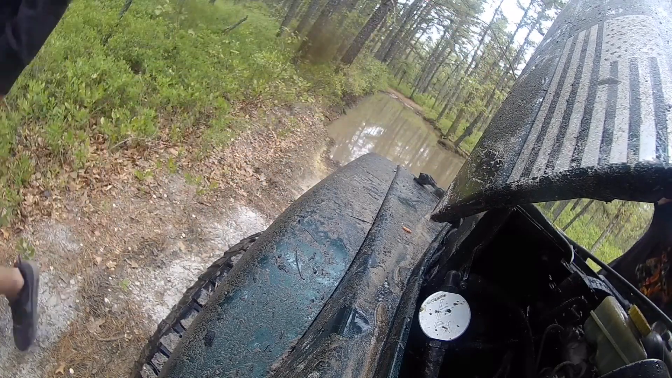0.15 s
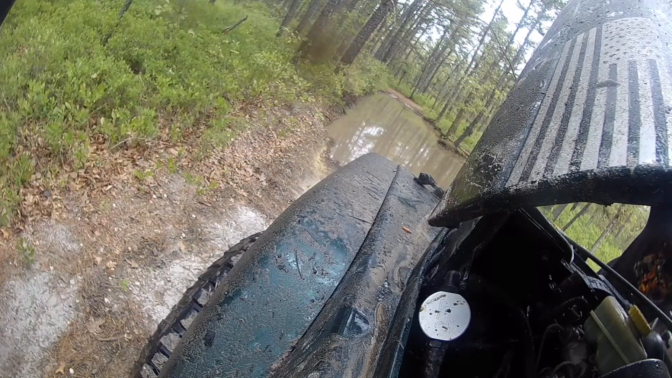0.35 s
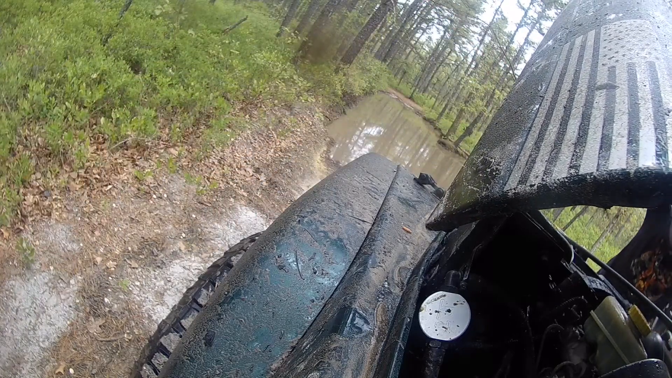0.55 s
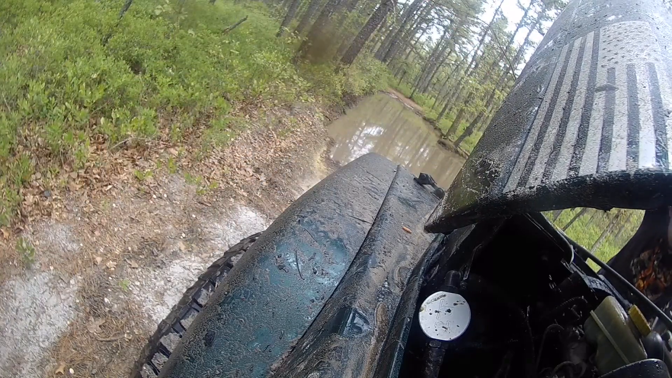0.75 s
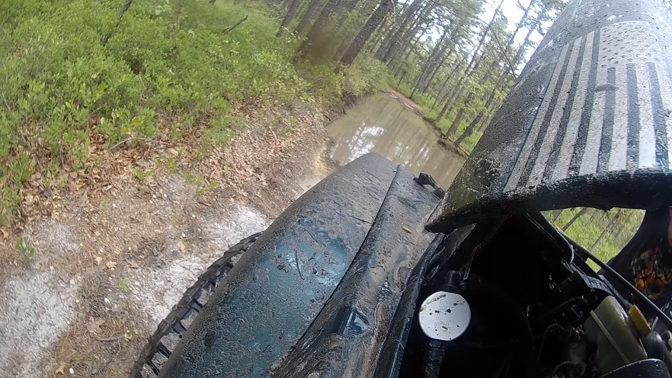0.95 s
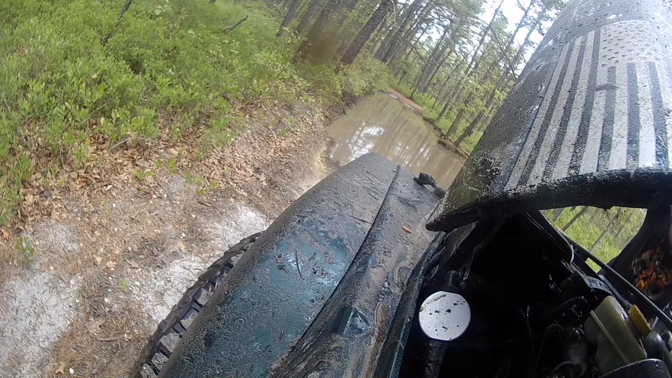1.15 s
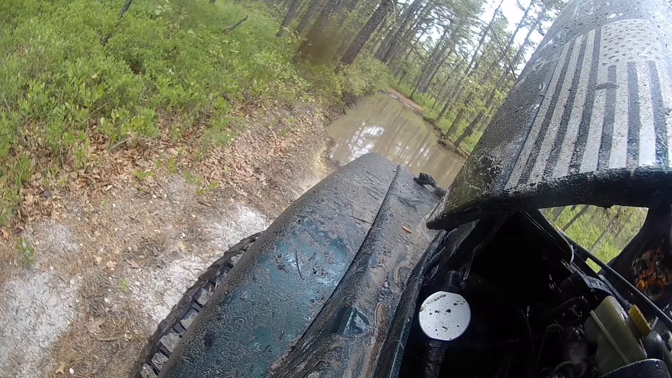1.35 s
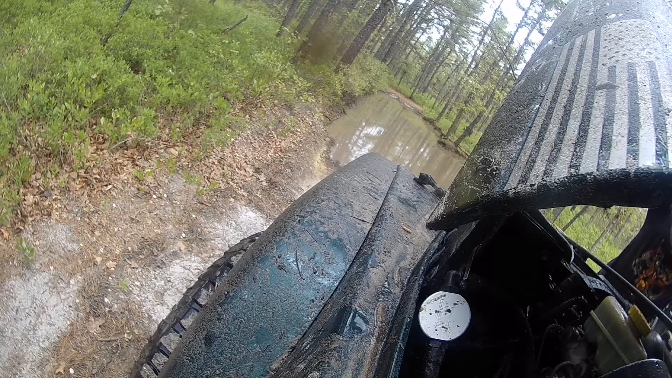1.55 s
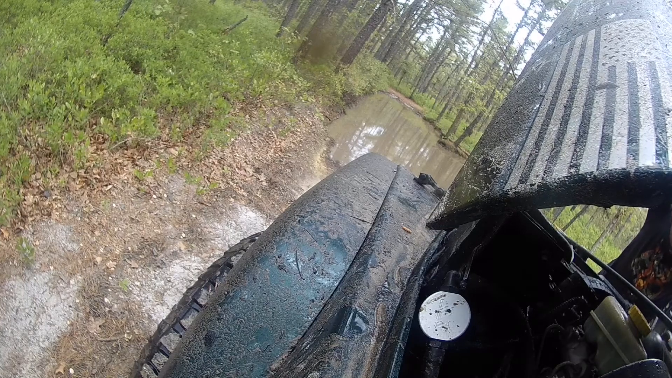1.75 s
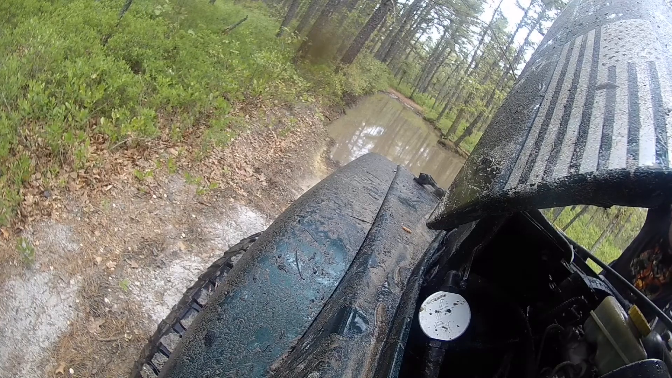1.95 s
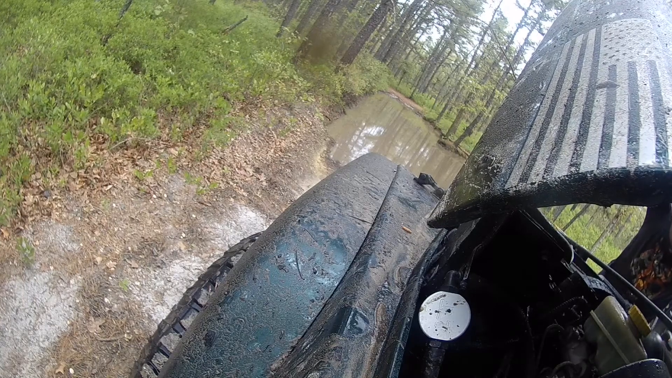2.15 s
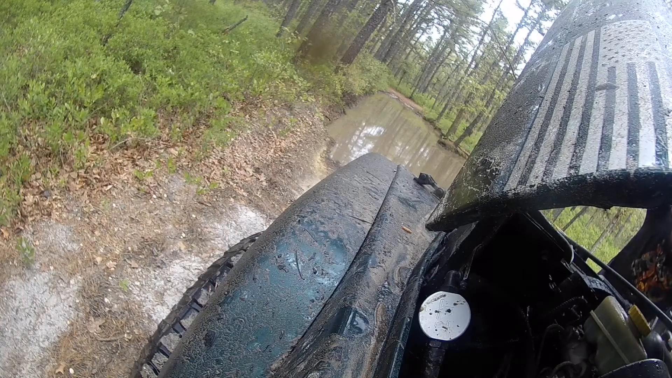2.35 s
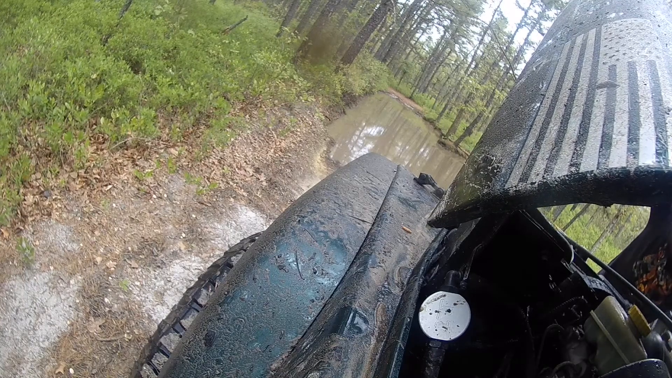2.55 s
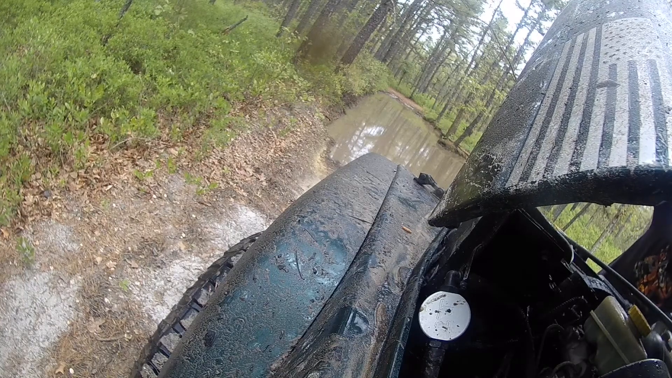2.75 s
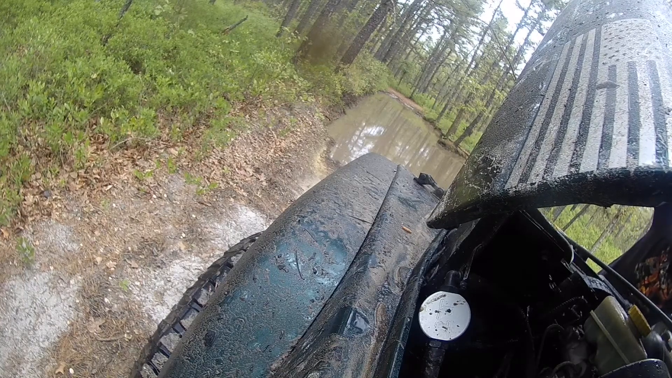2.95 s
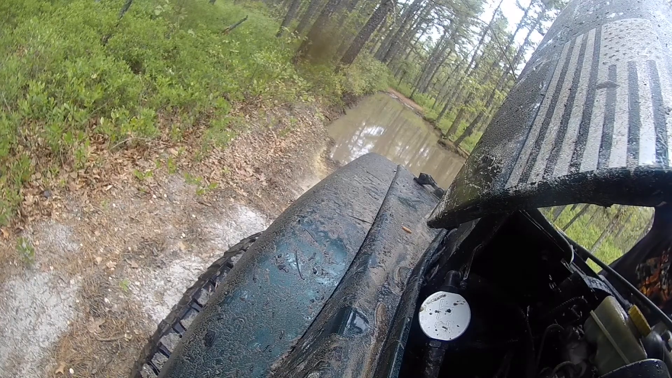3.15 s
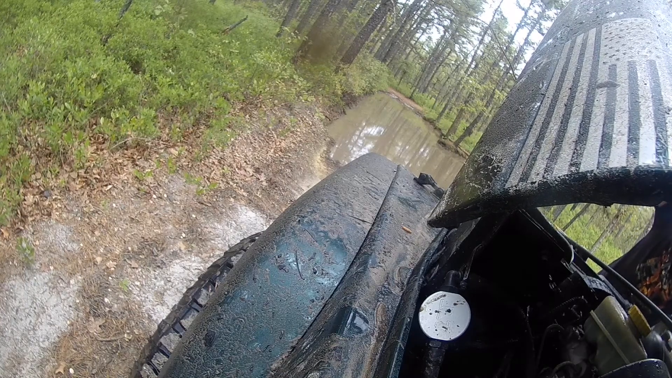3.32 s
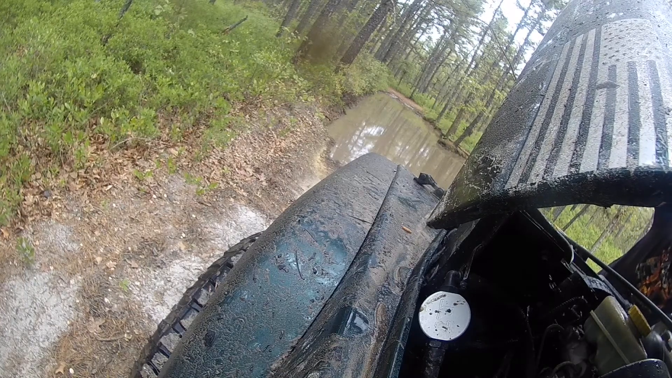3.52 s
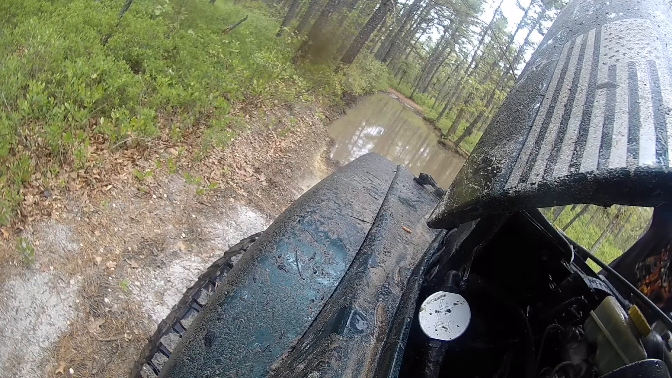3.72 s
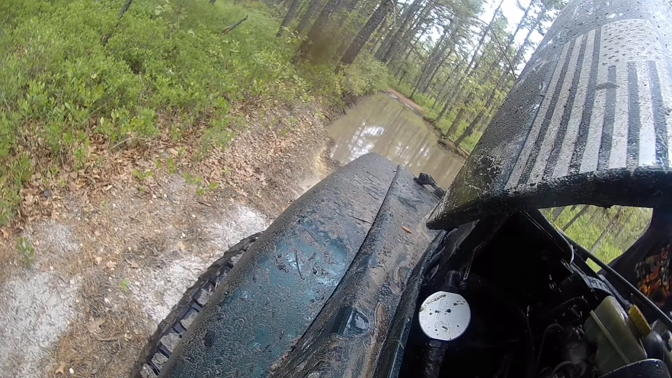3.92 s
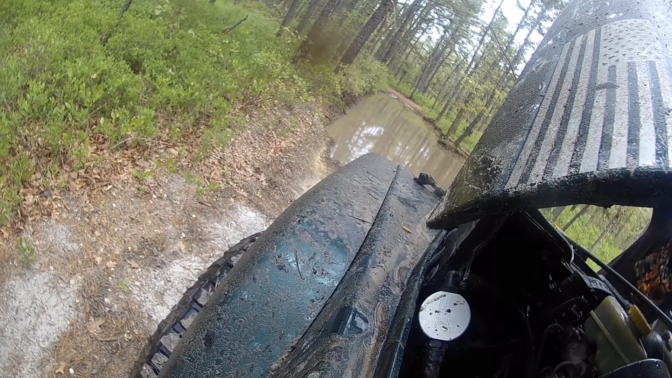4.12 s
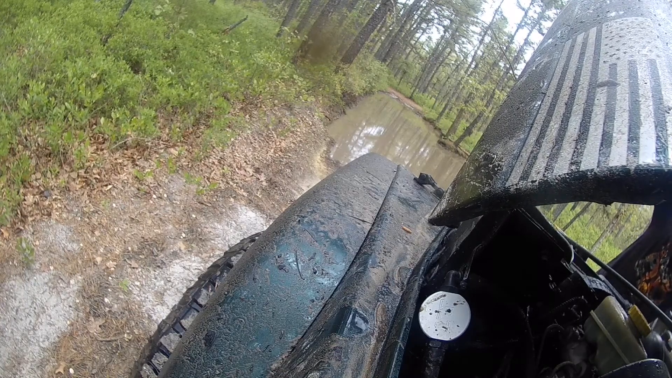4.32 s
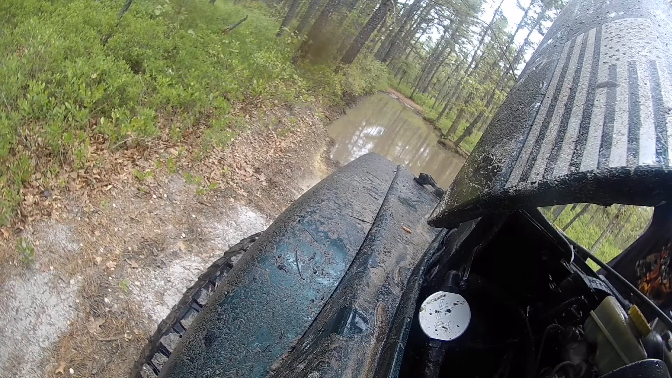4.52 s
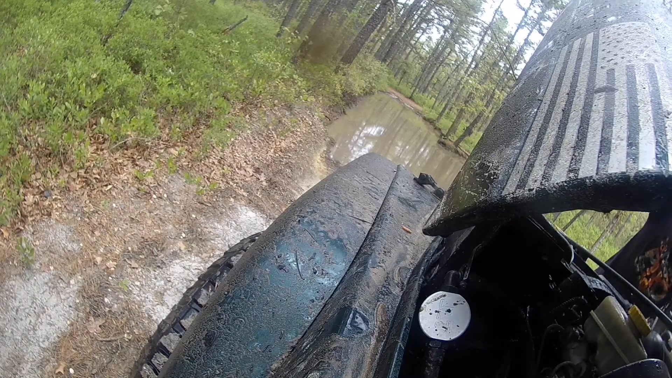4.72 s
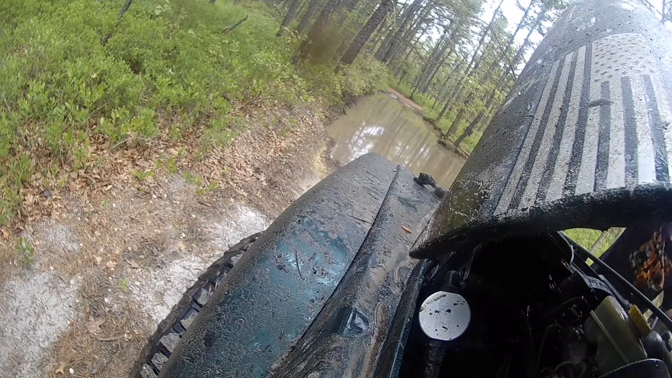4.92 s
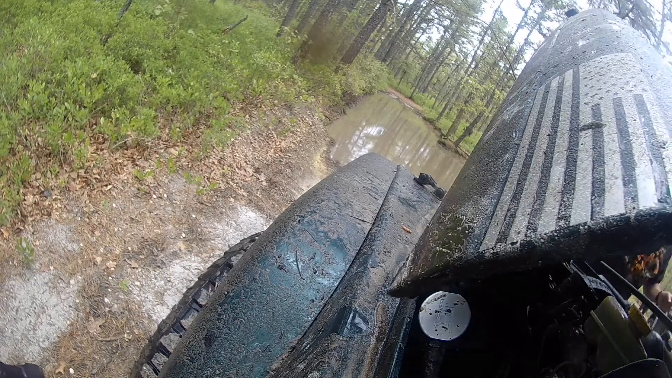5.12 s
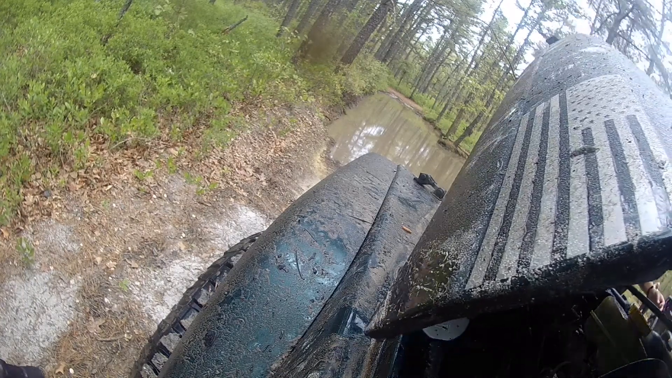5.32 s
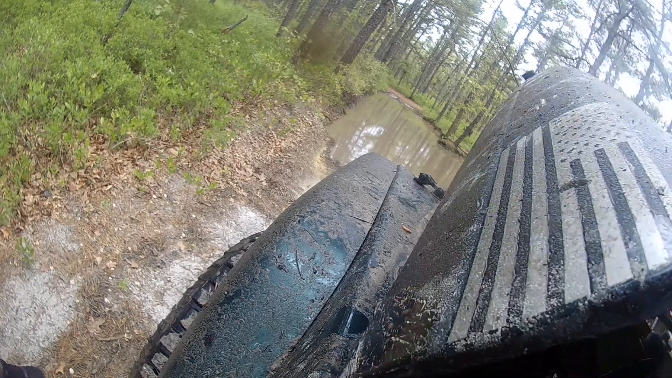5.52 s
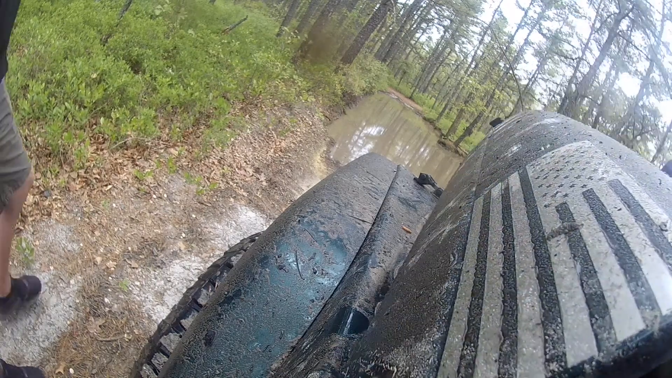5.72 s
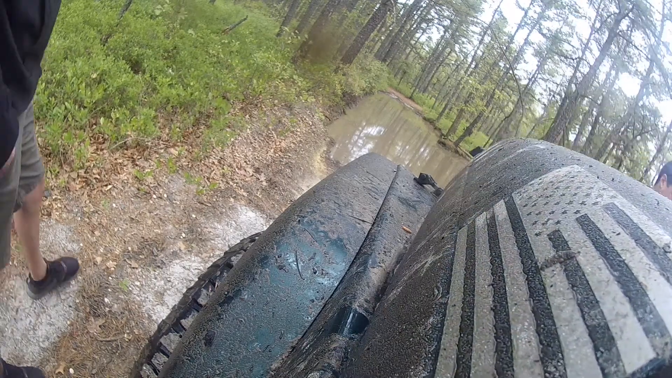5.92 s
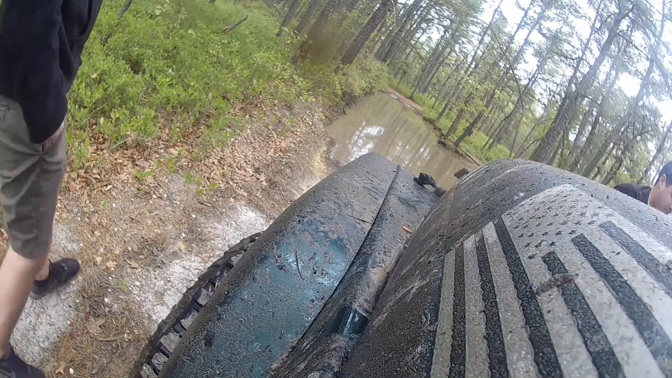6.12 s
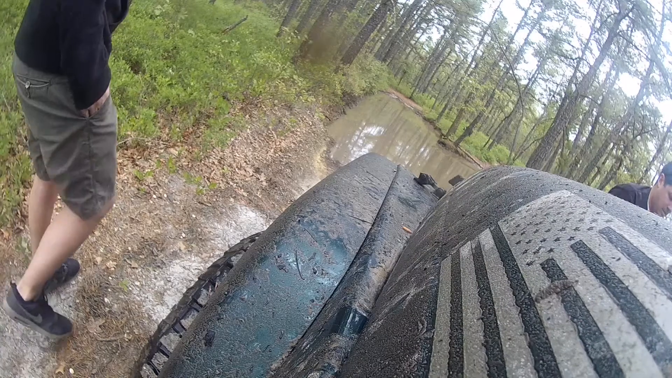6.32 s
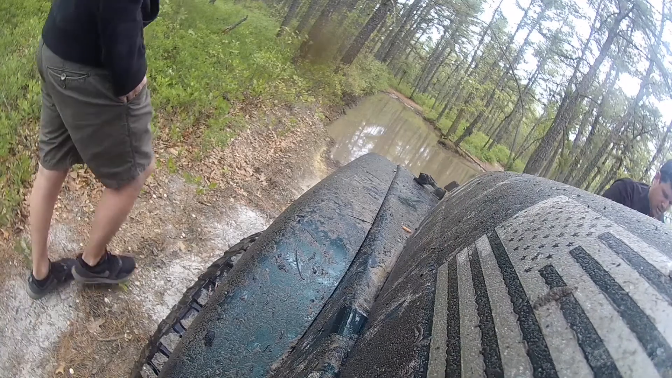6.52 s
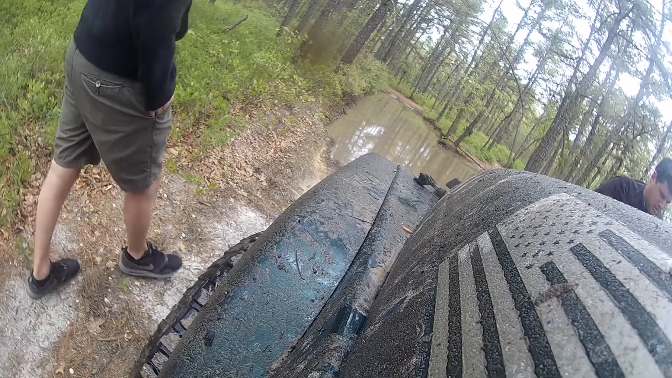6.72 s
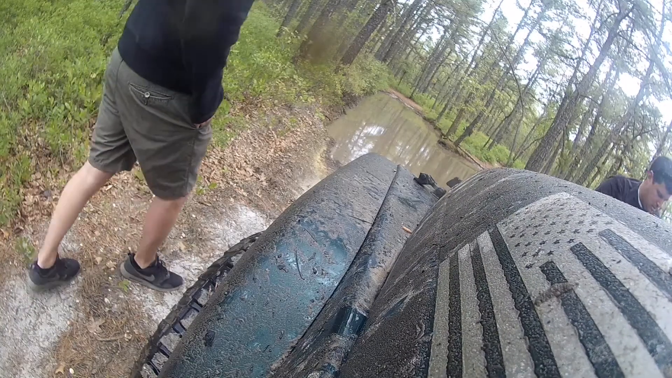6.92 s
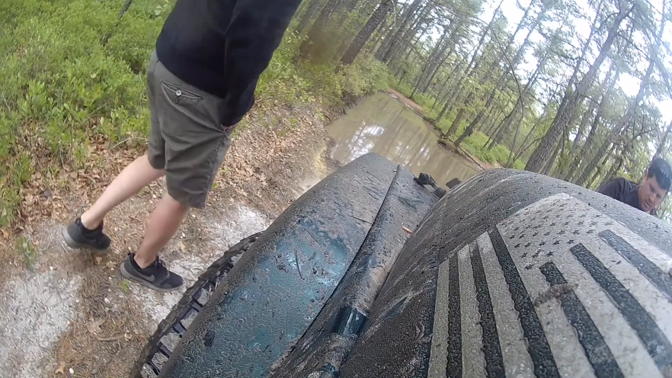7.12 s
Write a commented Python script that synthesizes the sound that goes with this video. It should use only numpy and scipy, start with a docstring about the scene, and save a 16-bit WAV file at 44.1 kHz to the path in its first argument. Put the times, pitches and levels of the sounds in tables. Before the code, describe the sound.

Soft woodland hiss and low murmur surround a raised metal hood. Sparse dull knocks, scratchy hinge rubs and faint low wobbling come through the bodywork carrying the microphone. After a near lull, the hood strikes its latch and slams home in two rapid, harsh, overloaded clanks. The latch chatters briefly, the body thuds, and a buzzing bass shudder dies away, with only a faint scattered echo from the trees.

```python
"""The hood of a parked off-road vehicle on a forest trail drops, strikes its latch and slams home.
Before that come a few knocks and rubs while it is held open. The slam rings the steel panel and latch
and overloads the microphone, then the hood rattles briefly as it settles. The jolted bodywork that
carries the microphone thuds and shudders with a deep, slowly dying rumble. Trees scatter the metal
sounds back faintly, over the filtered noise of quiet woodland air."""
import sys
import numpy as np
from scipy import signal
from scipy.fft import rfft, irfft
from scipy.io import wavfile

SR = 44100
rng = np.random.default_rng(int(sys.argv[2]) if len(sys.argv) > 2 else 0)


def wav_out(sig):
    """Save sig, one row per channel (or a flat mono array), as 16-bit PCM at SR to the path in sys.argv[1]."""
    wavfile.write(sys.argv[1], SR, np.round(np.clip(np.atleast_2d(sig).T, -1, 1) * 32767).astype(np.int16))


N = 320166  # length in samples

# Woodland air. Each row: pitch in Hz, relative level in dB.
AIR = [(12, -27), (20, 3.5), (33, -12.5), (53, -4), (98, -7.5), (187, -9), (319, -13.5), (357, -14),
       (607, -18.5), (1150, -24), (1330, -26), (1480, -25.5), (1960, -29), (13500, -41), (16000, -38.5)]
AIR_DB = -49

# Shoves that rock the bodywork before the hood shuts.
# Each row: start in seconds, length in seconds, strength in dB.
SHOVES = [(0, 0.074, -43.5), (0.677, .27, -49.5), (1.142, 0.077, -44.5), (1.433, 0.059, -46.5),
          (1.862, .38, -42), (2.603, 0.11, -38), (3.022, 0.0784, -45), (3.299, 0.199, -46),
          (3.683, 0.11, -42), (4.232, .45, -40), (5.58, .06, -45.5)]
SHOVE_RISE_S, SHOVE_FALL_S = 0.028, 0.055
# While held open, the hood keeps up a faint, growing sway that stops over a second before it drops.
HELD_SWAY_S, HELD_RISE_S, HELD_DB = 4.75, 2.96, -47
# Jolts that set the bodywork swinging freely. Each row: start in seconds, strength in dB.
JOLTS = [(6.125, -25.5), (6.478, -7)]
JOLT_RISE_S, JOLT_FALL_S = 0.0198, 0.305
SWAY_HZ, SAG_HZ = 48.2, 9  # pitch of a small swing, and how far it sags at the widest
STOP_DB, BUZZ_DB = -16.5, -24.5  # swing at which the mounting meets its stop; buzz at the widest swing
# Each soft thud briefly checks the swing: depth, lag and width of the dip.
CHECK_DB, CHECK_LAG_S, CHECK_WIDTH_S = -6, 0.026, 0.019

# Rubs of the hood and its hinges. Each row: start in seconds, length in seconds, level in dB.
RUBS = [(0, 0.89, -62.5), (0.898, .75, -60), (4.878, .28, -59.5), (5.512, 0.15, -54.5)]
RUB_RISE_S, RUB_FALL_S, RUB_REST_DB = 0.061, 0.12, -66.5

# Bounces of the hood in its latch as it settles. Each row: start in seconds, strength in dB.
BOUNCES = [(6.386, -29), (6.408, -30), (6.431, -35), (6.470, -23.5), (6.504, -34), (6.603, -50)]
BOUNCE_RISE_S, BOUNCE_FALL_S = 0.012, 0.016
RATTLE_REST_DB = -46  # faint rattle kept up by the rocking, relative to it
# Resonances of the rattling latch and hood edge. Each row: pitch in Hz, width in Hz, level in dB.
RATTLE_RING = [(810, 150, -11), (902, 23, 4), (1126, 100, -9), (1433, 37, -8), (1740, 48, -17),
               (2210, 100, -26), (2730, 22, -20)]

# Knocks on the held hood, then bumps of the mounting and a last light tick after the slam.
# Each row: start in seconds, metal level in dB, brightness in Hz, contact fade time in seconds,
# frame level in dB.
KNOCKS = [(0.387, -43, 3450, .012, -40.5), (.771, -54, 2800, .017, -49), (1.3143, -38.5, 3100, 0.011, -41),
          (1.862, -34.5, 2180, 0.011, -37), (1.881, -46, 1390, .005, -39), (3.499, -55.5, 1900, .007, -60),
          (4.179, -43, 8050, .007, -31.5), (4.194, -48, 2200, .007, -49), (4.23, -46, 3200, 0.0051, -39.5),
          (4.237, -48.5, 1800, 0.0089, -29.5), (5.29, -44.5, 4580, 0.0056, -58),
          (6.469, -43.5, 3807, .018, -36), (6.538, -52, 2400, .01, -40), (7.082, -56, 9050, .004, -72.5)]
# Resonances of a knock on metal. Each row: pitch in Hz, width in Hz, level in dB.
KNOCK_RING = [(780, 70, -18), (1105, 70, 0), (1225, 60, 0), (1405, 65, 0), (1900, 90, -17), (2250, 100, -6),
              (3080, 160, -16), (4000, 700, -23)]
# Duller sound of the frame. Each row: pitch in Hz, relative level in dB.
KNOCK_BODY = [(90, -13), (170, -6), (300, -5), (500, -7), (750, -2), (1200, -12.5), (2500, -28),
              (6000, -55)]
# The frame part of a knock also thuds the bodywork: level relative to the frame, and lag.
KNOCK_THUD_DB, KNOCK_THUD_LAG_S = 1, 0.00497

# Soft thuds in the bodywork. Each row: start in seconds, level in dB.
THUDS = [(3.043, -37.5), (3.207, -39), (6.128, -34), (6.189, -26), (6.305, -28.5), (6.466, -13),
         (6.567, -34), (6.738, -24.5)]
# Low modes of the bodywork. Each row: pitch in Hz, level in dB, time to fade by 60 dB in seconds.
BODY = [(67.8, -12, 0.54), (131, -15, 0.17), (169.6, 2.5, 0.21), (185, -12.5, 0.12), (271, -22.5, 0.28),
        (358, -24, 0.11)]

# Echo of the trees. Each row: delay in seconds, relative level in dB.
TREES = [(.02, -54), (.1, -42), (.19, -48), (.3, -37), (.5, -64), (.9, -71)]

# Blows of the falling hood. Each row: start in seconds, then panel, latch, crash and crack levels in dB.
BLOWS = [(6.1236, -20, -9.5, -17, -31), (6.129, -20, -22, -24.5, -12.5), (6.1880, -1, -12.5, -16.5, -24),
         (6.1940, -22, -15, -13.5, -1.5), (6.1994, -16, -19, -17, -13)]
# Sheet-metal hood. Each row: pitch in Hz, level in dB, time to fade by 60 dB in seconds.
PANEL = [(172, -16, .17), (300, -20, .14), (440, -35, .2), (556, -17, .13), (775, -14, .11), (888, 3, .07),
         (1055, -14, .08), (1185, -15, .08), (1425, -11, .08), (2708, -21, .08), (3200, -24, .07),
         (5050, -42, .12), (328, -19, .22), (620, -26, .27), (878, -22, .46), (942, -25, .24),
         (1062, -23, .21), (1163, -30, .45), (1452, -32, .45), (1663, -35, .22), (1790, -37, .38),
         (1943, -33, .19), (2218, -45, .5), (2822, -50, .42), (3300, -46, .48)]
# Steel latch and striker. Each row: pitch in Hz, level in dB, time to fade by 60 dB in seconds.
LATCH = [(912, -4, .11), (1085, 0, .08), (1132, -2, .13), (1378, -5, .1), (1425, -12, .2), (1720, -11, .16),
         (1920, -19, .09), (2205, -22, .12), (2708, -21, .14), (2775, -29, .2)]
# Dense modes of the hood, heard as noise. Each row: pitch in Hz, relative level in dB.
CRASH = [(100, -8.5), (260, 4), (450, -8.5), (700, -4.5), (1000, 7), (1500, -7), (2200, -13.5), (3200, -26),
         (5000, -39), (9000, -67)]
# Hard crack of steel on steel. Each row: pitch in Hz, relative level in dB.
CRACK = [(200, -19), (1000, 4.5), (2500, -2.5), (3800, -9), (7000, -22), (15000, -28)]

CLIP_LEVEL = 0.5  # the input cuts off any peak beyond this
TOP_HZ = 15900  # hardly anything passes above this


def undb(db):
    """Decibels to gain."""
    return 10 ** (np.asarray(db) / 20)


def clock():
    """Time of every sample in seconds."""
    return np.arange(N) / SR


def curve(rows):
    """Rows of time in seconds and value, joined by straight lines."""
    return np.interp(clock(), *np.transpose(rows))


def unit(x):
    """Scale to rms 1."""
    return x / np.sqrt(np.mean(x ** 2))


def place(x, s):
    """A sound that starts at time s on an otherwise silent track."""
    return np.concatenate([np.zeros(int(s * SR)), x, np.zeros(N)])[:N]


def noise(points):
    """Noise of rms 1 whose spectrum follows rows of pitch in Hz and level in dB."""
    hz, db = np.transpose(points)
    f = np.maximum(np.fft.rfftfreq(N, 1 / SR), 1)
    gain = undb(np.interp(np.log(f), np.log(hz), db))
    return unit(irfft(rfft(rng.standard_normal(N)) * gain, N))


def walk(rate):
    """Slow chance with a spread near 1: random points, rate per second, joined by lines."""
    knots = np.arange(0, N / SR + 1, 1 / rate)
    return np.interp(clock(), knots, rng.standard_normal(len(knots)))


def ring(modes, rise_s):
    """One second of decaying modes; neighbours swing in opposite directions."""
    t = clock()[:SR]
    swing = 0
    for k, (hz, db, t60) in enumerate(modes):
        fade = undb(db - 60 * t / t60)
        swing = swing + (-1) ** k * fade * np.sin(2 * np.pi * hz * t)
    return swing * (1 - np.exp(-t / rise_s))


def resonate(x, peaks):
    """Pass a sound through resonances side by side; neighbours swing in opposite directions."""
    out = 0
    for k, (hz, width, db) in enumerate(peaks):
        b, a = signal.iirpeak(hz, hz / width, fs=SR)
        out = out + (-1) ** k * undb(db) * signal.lfilter(b, a, x)
    return out


def soften(x, hz, order=3):
    """Take away the treble above hz."""
    return signal.sosfilt(signal.butter(order, min(hz, SR / 3), fs=SR, output="sos"), x)


def burst(rise_s, fall_s):
    """One second of a quick swell and an exponential fade."""
    t = clock()[:SR]
    return (1 - np.exp(-t / rise_s)) * np.exp(-t / fall_s)


def swell(s, length_s, rise_s, fall_s):
    """A level that rises from time s and starts to fade once its length is over."""
    age = np.maximum(clock() - s, 0)
    rise = 1 - np.exp(-age / rise_s)
    return rise * np.exp(-np.maximum(age - length_s, 0) / fall_s)


def air():
    """Quiet woodland air: a low, restless murmur under smooth hiss."""
    bed = noise(AIR)
    murmur = 0.17 * walk(6) * soften(bed, hz=710)
    return undb(AIR_DB) * (bed + murmur)


def rocking():
    """How hard the bodywork is rocked: by the held hood, by shoves, and by jolts that die away slowly."""
    held = undb(HELD_DB) * swell(0, HELD_SWAY_S, HELD_RISE_S, SHOVE_FALL_S)
    shoves = [undb(db) * swell(s, length_s, SHOVE_RISE_S, SHOVE_FALL_S) for s, length_s, db in SHOVES]
    jolts = [undb(db) * swell(s, 0, JOLT_RISE_S, JOLT_FALL_S) for s, db in JOLTS]
    return np.max([held, *shoves, *jolts], axis=0)  # the strongest one wins


def shudder():
    """The bodywork's lowest mode sways; wide swings sag in pitch and bump the mounting's stop each cycle."""
    drive = rocking()
    strain = drive / drive.max()
    # the stop gently limits the swing, and soft thuds check it
    swing = drive / (1 + (drive / undb(STOP_DB)) ** 4) ** (1 / 4)
    dips = sum(np.exp(-((clock() - s - CHECK_LAG_S) / CHECK_WIDTH_S) ** 2) for s, _ in THUDS)
    swing = swing * undb(CHECK_DB * dips)

    # a weak sway is pushed about at random, a strong one rings steadily
    unrest = 1 / (1 + swing / 0.00717)
    pitch_hz = SWAY_HZ - SAG_HZ * strain ** 3.48 + 8 * unrest * walk(25)
    phase = 2 * np.pi * np.cumsum(pitch_hz) / SR
    wobble = undb(unrest * (2.9 * walk(30) - 2.0))
    sway = np.sqrt(2) * swing * wobble * np.sin(phase)

    # about one bump per cycle, uneven in timing and strength
    cycles = np.floor((phase + 0.8 * walk(45)) / (2 * np.pi))
    bumps = np.diff(cycles, prepend=0) * undb(3.4 * walk(40))
    buzz = unit(resonate(soften(bumps, hz=328), [(164, 38, -2.5), (208, 54, -12.0)]))
    # noise that chafes on one side of each swing
    chafe = np.maximum(np.sin(phase), 0) ** 2 * noise(KNOCK_BODY) * swing ** 2
    return sway + buzz * undb(BUZZ_DB) * strain ** 2.33 + undb(-18.0) * chafe


def rubbing():
    """Fine uneven slips in the hinges and under the hands sound through broad resonances of the hood."""
    slips = rng.standard_normal(N) * undb(2.9 * walk(120))
    rubs = sum(undb(db) * swell(s, length_s, RUB_RISE_S, RUB_FALL_S) for s, length_s, db in RUBS)
    level = np.maximum(rubs, undb(RUB_REST_DB))
    hood = [(1120, 177, 4.0), (1430, 620, -3.0), (2060, 830, -6)]  # Hz, width in Hz, dB
    return unit(resonate(soften(slips, hz=3500), hood)) * level


def rattle():
    """Many tiny contacts ring the latch and hood edge, faintly with the rocking and more at each bounce."""
    contacts = rng.standard_normal(N) * (rng.random(N) < 2500 / SR)  # about 2500 a second
    bounces = sum(place(undb(db) * burst(BOUNCE_RISE_S, BOUNCE_FALL_S), s) for s, db in BOUNCES)
    level = bounces + undb(RATTLE_REST_DB) * rocking()
    return unit(resonate(soften(contacts, hz=4030), RATTLE_RING)) * level


def knocks():
    """Each knock or bump is a brief chatter of contacts that rings metal, plus a duller part from the frame."""
    out = 0
    for s, metal_db, bright_hz, contact_s, frame_db in KNOCKS:
        chatter = rng.standard_normal(SR) * np.exp(-clock()[:SR] / contact_s)
        # a hard, light contact is thin as well as bright
        push = soften(chatter, bright_hz)
        push = signal.sosfilt(signal.butter(2, 0.17 * bright_hz, "high", fs=SR, output="sos"), push)
        metal = resonate(push, KNOCK_RING)
        metal = metal / np.std(metal[:SR // 50])  # even out the first 20 ms
        frame = noise(KNOCK_BODY)[:SR] * burst(0.0016, 0.018)
        out = out + place(undb(metal_db) * metal + undb(frame_db) * frame, s)
    return out


def thuds():
    """Soft bumps, and the frame part of every knock, ring the low modes of the bodywork."""
    body = ring(BODY, rise_s=0.0038)
    knocked = [(s + KNOCK_THUD_LAG_S, frame_db + KNOCK_THUD_DB) for s, *_, frame_db in KNOCKS]
    return sum(place(undb(db) * body, s) for s, db in [*THUDS, *knocked])


def forest(x):
    """Many trunks scatter the sound back faintly, as a fading spray of random echoes."""
    trunks = rng.standard_normal(SR) * undb(curve(TREES))[:SR]
    # trunks reflect little bass, and the air takes the treble
    scatter = soften(trunks, hz=3230) - soften(trunks, hz=450, order=1)
    return undb(-28.0) * signal.fftconvolve(x, scatter)[:N]


def slam():
    """The hood hits the latch, bounces and drives home; blows crack and ring panel, latch and dense modes."""
    out = 0
    panel = ring(PANEL, rise_s=0.0012)
    latch = ring(LATCH, rise_s=0.00058)
    for s, panel_db, latch_db, crash_db, crack_db in BLOWS:
        crash = noise(CRASH)[:SR] * burst(0.0013, 0.023)
        crack = noise(CRACK)[:SR] * burst(0.00078, 0.0013)
        ringing = undb(panel_db) * panel + undb(latch_db) * latch
        blow = ringing + undb(crash_db) * crash + undb(crack_db) * crack
        out = out + place(blow, s)
    return out


def scene():
    """Everything as it reaches the microphone on the bodywork."""
    metal = slam() + rattle() + knocks()
    bodywork = thuds() + shudder()
    return (metal + forest(metal) + bodywork + rubbing() + air())[None]


def record(dry):
    """The slam overloads the input, which clips it; the treble is then rounded and cut."""
    clipped = np.clip(dry, -CLIP_LEVEL, CLIP_LEVEL)
    rounded = soften(clipped, hz=15100, order=1)
    return signal.sosfiltfilt(signal.ellip(8, .05, 60, TOP_HZ, fs=SR, output="sos"), rounded)


dry = scene()
out = record(dry)
wav_out(out)
```